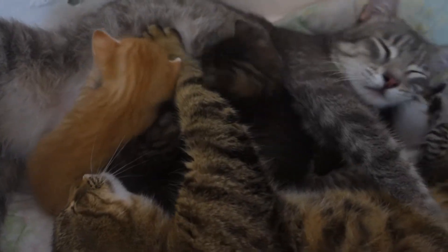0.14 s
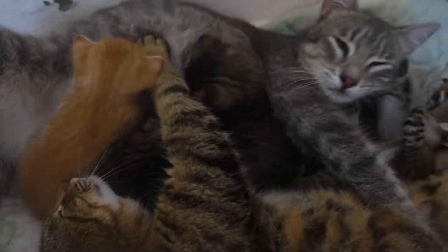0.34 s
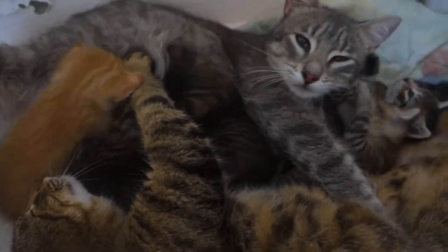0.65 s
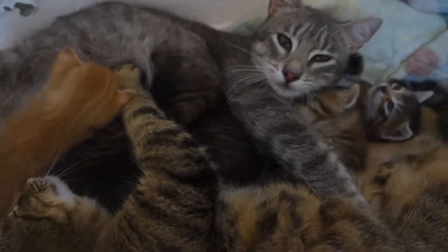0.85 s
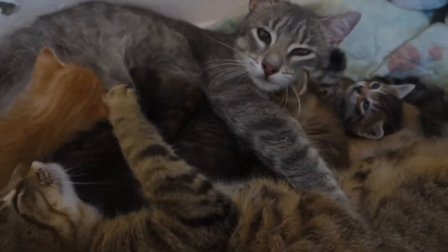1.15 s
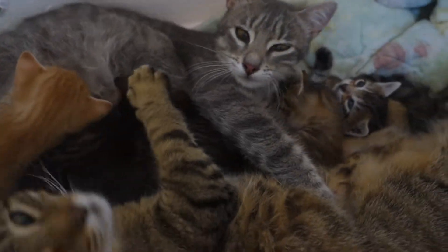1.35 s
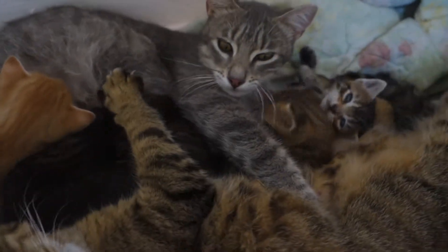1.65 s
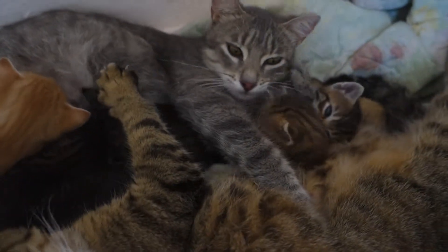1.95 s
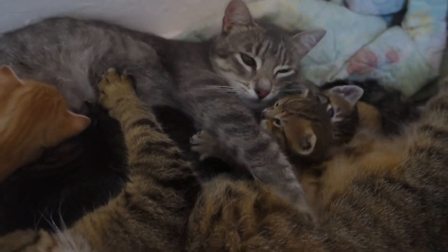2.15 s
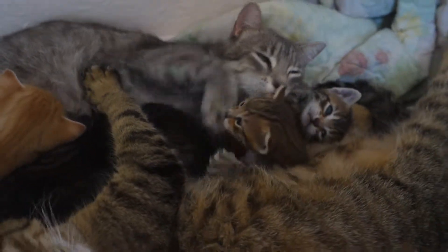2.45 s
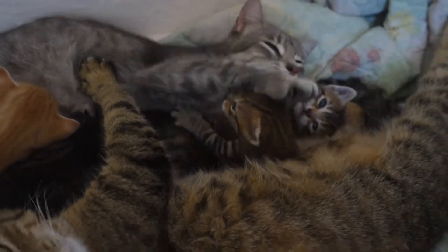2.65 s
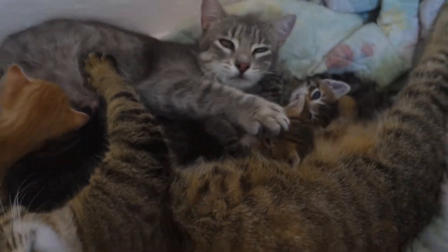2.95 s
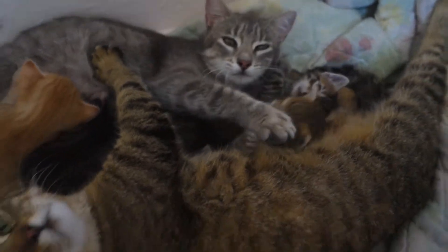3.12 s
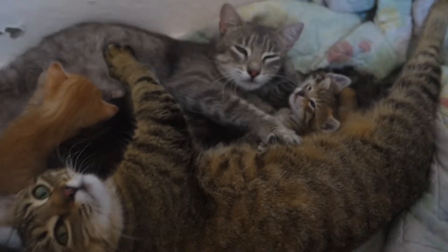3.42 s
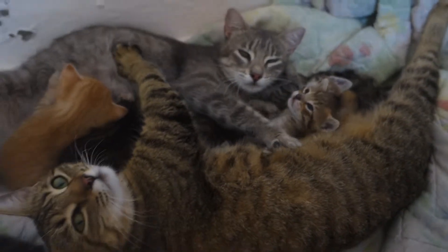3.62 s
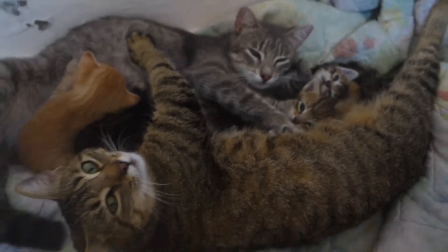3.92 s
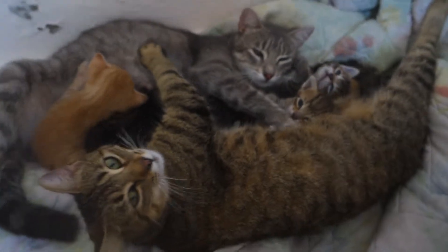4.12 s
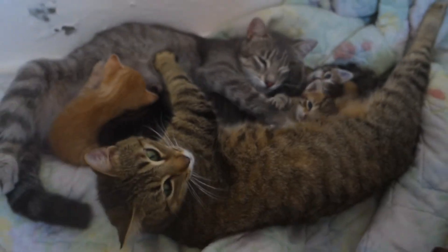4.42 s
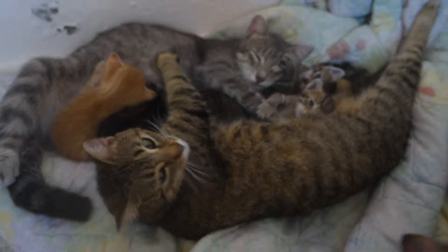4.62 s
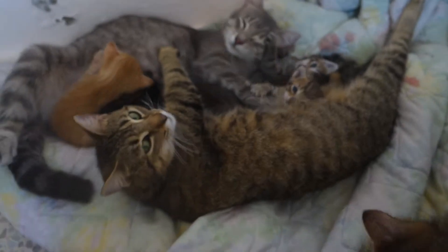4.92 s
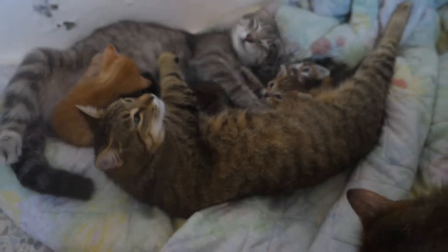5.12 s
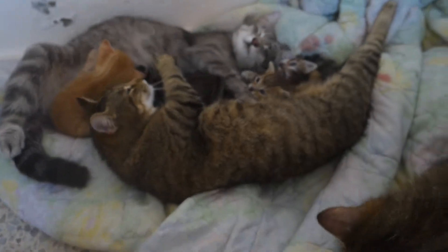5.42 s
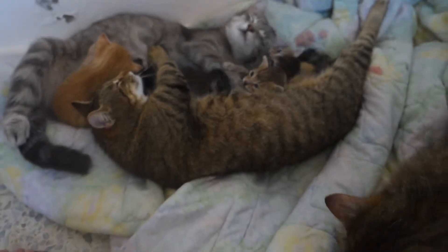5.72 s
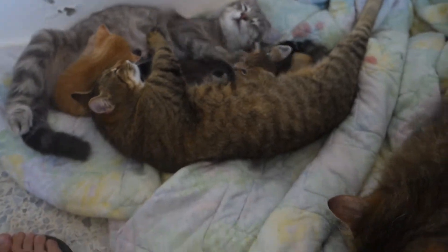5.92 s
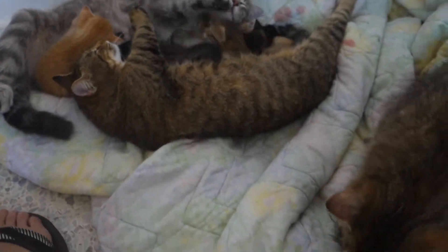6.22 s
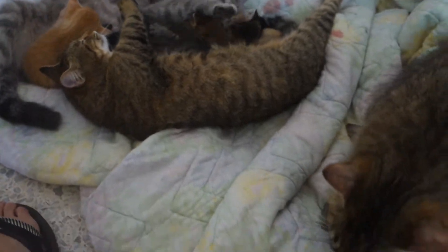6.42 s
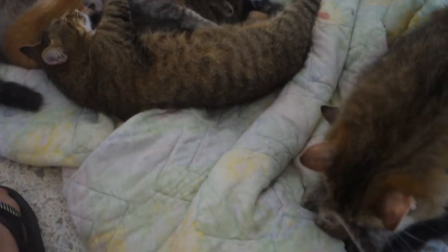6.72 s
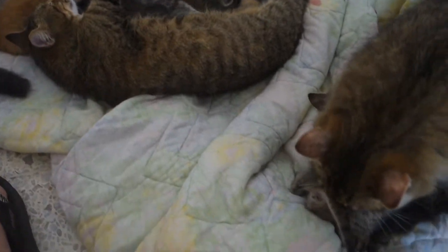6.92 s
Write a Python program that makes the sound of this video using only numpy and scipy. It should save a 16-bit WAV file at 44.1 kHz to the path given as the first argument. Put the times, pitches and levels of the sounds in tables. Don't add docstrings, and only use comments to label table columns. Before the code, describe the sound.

Shrill kitten mews and tiny squeaks ring through a bare room, with a cat's rolling trills, soft purrs, sharp claw snaps and low hum.

```python
import sys
import numpy as np
from scipy import signal
from scipy.fft import rfft, irfft
from scipy.io import wavfile
from scipy.ndimage import uniform_filter1d

SR = 44100
rng = np.random.default_rng(int(sys.argv[2]) if len(sys.argv) > 2 else 0)


def to_wav(s):
    ch = np.atleast_2d(s).T
    pcm = np.round(np.clip(ch, -1, 1) * 32767)
    wavfile.write(sys.argv[1], SR, pcm.astype(np.int16))


def gain_from_decibels(decibels):
    exponent = np.asarray(decibels, float) / 20
    return 10 ** exponent


N = 311326
LEAD = 8820


def rms_one(x):
    return x / np.sqrt(np.mean(x ** 2) + 1e-20)


def at_hz(points, hz):
    table_hz, value = np.transpose(points)
    return np.interp(np.log(hz), np.log(table_hz), value)


def drift(rate_hz, size=N):
    r = np.exp(-2 * np.pi * rate_hz * 40 / SR)
    noise = rng.standard_normal(size // 40 + 2002)
    slow = signal.lfilter([1], [1, -2 * r, r * r], noise)[2000:]
    return np.interp(np.arange(size) / 40, np.arange(len(slow)), rms_one(slow))


def panned(x, left_minus_right_db):
    return x * gain_from_decibels(np.array([[left_minus_right_db / 2], [-left_minus_right_db / 2]]))


def band_noise(low_hz, high_hz):
    band = signal.butter(3, [low_hz, high_hz], "band", fs=SR, output="sos")
    return rms_one(signal.sosfilt(band, rng.standard_normal(N)))


def bands(length):
    edges = 25 * 2 ** np.arange(0, 9.6, .5)
    white = rng.standard_normal((2, 2, length))
    for k, (low, high) in enumerate(zip(edges, edges[1:])):
        band = signal.butter(2, [low, high], "band", fs=SR, output="sos")
        yield np.sqrt(low * high), signal.sosfilt(band, white[k % 2])


def coherent_pair(mid, side, likeness):
    alike = np.clip(likeness, 0, 1)
    return np.sqrt(1 + alike) * mid + np.sqrt(1 - alike) * side * [[1], [-1]]


# frequency_hz, left_right_likeness (0-1)
LIKENESS = [(60, 1), (250, 0.98), (600, 0.9), (1500, 0.6), (4000, 0.043), (9000, 0.067), (15000, 0.17)]


def banded_noise(spectrum, patchy_db):
    out = 0
    for hz, (mid, side) in bands(N):
        gain = gain_from_decibels(at_hz(spectrum, hz) + patchy_db * drift(1.77))
        out = out + gain * coherent_pair(mid, side, at_hz(LIKENESS, hz))
    return rms_one(out)


def swelling(rest_db, swells):
    step = 32
    power = np.full(N // step + 2, gain_from_decibels(2 * rest_db))
    t = np.arange(len(power)) * step / SR
    for peak_s, rise_s, level_db in swells:
        age = np.maximum((t - peak_s) / rise_s + 1, 0)
        power += gain_from_decibels(2 * level_db) * (age * np.exp(1 - age)) ** 4
    return np.interp(np.arange(N) / step, np.arange(len(power)), np.sqrt(power))


# start_s, length_s, start_pitch_hz,
# end_pitch_hz, level_db
SQUEAKS = [
    (-.19, .17, 2650, 2350, -41),
    (1.307, 0.18, 3520, 3455, -41.5),
    (0.935, 0.12, 7055, 7050, -64),
    (0.978, 0.26, 6870, 6380, -58.5),
    (1.577, 0.093, 3450, 3446, -58),
    (3.745, 0.16, 3564, 3456, -43),
    (3.85, 0.56, 3526, 3407, -58),
]


def squeaks():
    out = np.zeros(N + LEAD)
    for start_s, length_s, start_hz, end_hz, level_db in SQUEAKS:
        n = round(length_s * SR)
        pitch_hz = np.linspace(start_hz, end_hz, n) * (1 + 0.0051 * drift(55, n))
        tone = np.sin(2 * np.pi * np.cumsum(pitch_hz) / SR)
        out[round(start_s * SR) + LEAD:][:n] += gain_from_decibels(level_db) * np.hanning(n) * tone
    return out


def mouth_db(hz, k, opening, sharpness):
    ratio = hz / (1500 + 3000 * opening)
    peak_db = -10 * np.log10((1 - ratio ** 2) ** 2 + (ratio / sharpness) ** 2)
    muffle_db_per_octave = 49.5 * np.maximum(0.43 - opening, 0)
    return peak_db - muffle_db_per_octave * np.log2(k)


SOURCE_DB = [0.05, -1, -4, -3]
# frequency_hz, level_over_partial_4_db
SHINE = [(5000, -8.5), (7200, -10.5), (8500, -26), (10000, -20.5), (12000, -16), (14000, -19.5),
         (16000, -28)]


def mew(rows, shine_db, hoarse):
    s, *columns = np.transpose(rows)
    span = np.arange(round(s[0] * SR), round(s[-1] * SR))
    n = len(span)
    pitch, effort_db, opening = [uniform_filter1d(np.interp(span / SR, s, c), size=900) for c in columns]

    soft_db, full_db, soft_q, loud_q = -62, -58.5, 4.7, 31.3
    sharpness = np.interp(effort_db, [soft_db, full_db], [soft_q, loud_q])
    sharpness = sharpness * np.interp(opening, [.5, .8], [0.54, 1])
    levels_db = []
    for k, source_db in enumerate(SOURCE_DB, start=1):
        q = sharpness if k < 4 else soft_q
        levels_db.append(effort_db + source_db + mouth_db(k * pitch, k, opening, q))
    levels_db[3] += np.interp(effort_db, [soft_db, full_db + 4], [-4, 0])

    tremble = 0.0044 * drift(20.8, n) + 0.0034 * hoarse * drift(98, n)
    phase = 2 * np.pi * np.cumsum(pitch * (1 + tremble)) / SR
    out = np.zeros(N + LEAD)
    for k in range(1, 17):
        level_db = levels_db[k - 1] if k < 5 else levels_db[3] + shine_db + at_hz(SHINE, k * pitch)
        breath = min(hoarse * max(k - 2, 0) ** 2 * .8, 2)
        wander_db = 1.2 * drift(47, n)
        voiced = (1 + breath * drift(68, n)) * np.sin(k * phase) + breath * drift(68, n) * np.cos(k * phase)
        gain = np.sqrt(2 / (1 + 2 * breath ** 2)) * gain_from_decibels(level_db + wander_db)
        out[span + LEAD] += gain * voiced * (k * pitch < 16500)
    return out


# start_s, pitch_hz, effort_db, mouth_opening (0-1)
MEWS = [
    [(-.06, 1163, -58.5, 1), (.005, 1310, -42, 0.68), (.035, 1452, -50, 0.78), (.128, 1435, -40, 0.5),
     (.15, 1427, -56.5, 0.56), (.25, 1391, -50, 0.26), (.36, 1064, -55.5, 0)],
    [(1.2, 1103, -67, 0.28), (1.28, 1352, -58.5, .7), (1.325, 1369, -49, 0.77), (1.36, 1476, -47.5, 0.73),
     (1.44, 1508, -46.5, .62), (1.52, 1468, -46.5, 0.54), (1.8, 1331, -55, 0.45), (1.93, 1090, -63, 0.16)],
    [(3.44, 619, -64, 0.02), (3.56, 1277, -63, 0.71), (3.6, 1331, -56.5, 0.67), (3.76, 1383, -43.5, 0.6),
     (3.92, 1409, -58.5, 0.38), (4.05, 1323, -62, 0.37), (4.12, 1144, -55, 0.03)],
    [(5.84, 728, -69, 0.26), (5.928, 1207, -53.5, 0.88), (5.96, 1300, -45, .81), (6.005, 1373, -45.5, 0.75),
     (6.05, 1452, -43, 0.78), (6.17, 1452, -45.5, 0.51), (6.235, 1415, -45.5, .36),
     (6.45, 1193, -55.5, 0.11)],
]
MEW_PAN_DB = [-2, -15, -10, -9]
MEW_SHINE_DB = [-4.5, 1, -6, 5.5]
MEW_HOARSE = [.03, 1.0, .35, .005]
MEW_ECHO_DB = [-1, 0.5, 2, -6]


def mews():
    calls = [mew(*call) for call in zip(MEWS, MEW_SHINE_DB, MEW_HOARSE)]
    direct = sum(panned(call, pan_db) for call, pan_db in zip(calls, MEW_PAN_DB))
    sent = sum(gain_from_decibels(level_db) * call for call, level_db in zip(calls, MEW_ECHO_DB))
    return direct, sent


# frequency_hz, t60_s
ROOM_T60 = [(300, 0.71), (1400, 1.58), (2400, 2), (2800, 1.45), (3500, 1.5), (4200, 1.33), (7000, 1.5),
            (13000, 0.66)]
# frequency_hz, left_right_likeness (0-1)
ROOM_LIKENESS = [(300, 1), (700, 1), (1500, 0.85), (3000, 0.22), (6000, 0.12)]


def room(x):
    t = np.arange(round(1.6 * SR)) / SR
    echo = 0
    for hz, (mid, side) in bands(len(t)):
        pair = coherent_pair(mid, side, at_hz(ROOM_LIKENESS, hz))
        echo = echo + pair * gain_from_decibels(-60 * t / at_hz(ROOM_T60, hz))
    onset = np.clip((t - .003) / 0.0043, 0, 1)
    near_walls = 1 + 1.7 * np.exp(-t / 0.17)
    echo = rms_one(echo * onset * near_walls) / np.sqrt(len(t))
    return signal.fftconvolve(x[None], echo, axes=1)[:, :len(x)]


def afterglow():
    t = np.arange(N) / SR
    fade = gain_from_decibels(-49 - 8.5 * t - 40 * np.maximum(t - 1.15, 0))
    return fade * np.array([band_noise(2140, 3320) + 0.88 * band_noise(2300, 2700) for _ in "lr"])


# frequency_hz, width_hz, level_db
DRONES = [
    (84.1, 3, -49.5),
    (105.5, 17, -56),
    (356, 18, -57),
    (425, 11, -61),
]


def hum():
    level_db = -35.5 + 0.28 * drift(0.84)
    out = np.sqrt(2) * gain_from_decibels(level_db) * np.sin(2 * np.pi * 59.83 * np.arange(N) / SR + 0.43)
    for hz, width_hz, level_db in DRONES:
        r = np.exp(-np.pi * width_hz / SR)
        poles = [1, -2 * r * np.cos(2 * np.pi * hz / SR), r * r]
        out += gain_from_decibels(level_db) * rms_one(signal.lfilter([1, 0, -1], poles, rng.standard_normal(N)))
    return out


# frequency_hz, density_db (dB per Hz)
AIR = [(28, -9), (45, -7), (80, 3.5), (120, -6.5), (160, -12.5), (220, -12), (400, -9.5), (630, -16),
       (1000, -14.5), (1600, -24), (2500, -34.5), (4500, -47), (8000, -49.5), (16000, -39)]


def ventilation():
    return gain_from_decibels(-45) * banded_noise(AIR, patchy_db=.9)


# peak_s, rise_s, level_db
DEEP_SWELLS = [(.23, 0.035, -46.5), (.5, 0.24, -51), (1.14, 0.038, -49), (1.62, 0.22, -46.5),
               (2.08, 0.063, -51), (2.45, 0.23, -50), (2.71, 0.037, -46), (2.95, 0.098, -47.5),
               (3.52, 0.26, -50.5), (5.499, 0.05, -47), (6.7, 0.04, -49)]
# peak_s, rise_s, level_db
CHESTY_SWELLS = [(.23, 0.063, -49), (0.571, 0.053, -41.5), (1.14, 0.018, -61.5), (3.05, 0.029, -43),
                 (5.41, 0.12, -47.5), (6.188, 0.24, -48), (6.622, 0.11, -44.5), (6.98, 0.056, -44)]


def purr():
    deep = swelling(-54.5, DEEP_SWELLS) * gain_from_decibels(0.33 * drift(27)) * band_noise(131.0, 173.6)
    chesty = swelling(-55, CHESTY_SWELLS) * gain_from_decibels(0.45 * drift(17)) * band_noise(196, 304)
    return deep + chesty


# frequency_hz, density_db (dB per Hz)
RUSTLE_COLOUR = [(2500, 6.5), (5000, 0), (9000, -1.5), (13000, -10), (16000, -1.5)]
# peak_s, rise_s, level_db
STIRS = [(0.019, 0.27, -59.5), (.75, .3, -64), (1.22, .07, -55.5), (1.42, 0.21, -66), (1.918, 0.11, -59),
         (2.7, 0.081, -62), (3.8, 0.17, -65.5), (4.56, 0.027, -65), (4.773, 0.009, -52.5),
         (5.901, 0.13, -61), (6.25, 0.11, -62.5)]


def rustle():
    hiss = banded_noise([(1200, -60.5), *RUSTLE_COLOUR], patchy_db=1.0)
    return swelling(-65.5, STIRS) * panned(hiss, -5.5)


# start_s, pitch_hz, effort_db
TRILLS = [
    [(.503, 375, -37), (.535, 392.3, -43), (.564, 439.4, -27.5), (.68, 384.8, -30.5), (.75, 407.3, -28.5),
     (.82, 435.8, -27.5), (.9, 484.7, -29.5), (.97, 493.5, -32), (1.05, 504.5, -48)],
    [(2.874, 350, -30.5), (2.93, 379.7, -36.5), (2.97, 405.7, -31), (3.03, 380.5, -51)],
    [(5.382, 405, -41), (5.42, 425, -28), (5.45, 415, -25.5), (5.52, 425, -36)],
]


def throbs():
    period_s, slip_s, scatter_db = .0305, .002, 1.5
    rows = []
    for s, _, effort_db in map(np.transpose, TRILLS):
        age = np.arange(0, s[-1] - s[0], period_s)
        slip, loud, bright = rng.standard_normal((24, 3))[:len(age)].T
        level_db = np.interp(s[0] + age, s, effort_db) + scatter_db * loud
        over_db = np.interp(age, [0, .25], [-20, -4])
        rows.append([s[0] + age + slip_s * slip, level_db, over_db + 2 * scatter_db * bright])
    return np.hstack(rows)


def pulse_train(start_s, level_db, rise_s):
    impulses = np.zeros(N)
    impulses[(start_s * SR).astype(int)] = gain_from_decibels(level_db)
    t = np.arange(round(.08 * SR)) / SR
    return signal.fftconvolve(impulses, (t / rise_s * np.exp(1 - t / rise_s)) ** 2)[:N]


def trill():
    start_s, level_db, over_db = throbs()
    throb = pulse_train(start_s, level_db, .0115)
    edge = pulse_train(start_s, level_db + over_db, .007)
    pitch = np.interp(np.arange(N) / SR, *np.vstack(TRILLS).T[:2]) * (1 + .022 * drift(60))
    phase = 2 * np.pi * np.cumsum(pitch) / SR
    overtones = 0.49 * np.sin(2 * phase) + 0.5 * np.sin(3 * phase)
    breathy = .33 * throb * band_noise(260, 520) + .22 * edge * band_noise(850, 1550)
    return throb * np.sin(phase) + edge * overtones + breathy


# start_s, peak_level_db, length_s, brightness_db_per_octave, left_minus_right_db
SNAGS = [
    (1.776, -44, .004, -18, -9),
    (4.7027, -15.5, 0.0011, -2, -7),
    (4.704, -21, 0.0013, -4, -20),
    (4.7752, -25, 0.0018, -11, -18),
    (4.946, -44, 0.0026, -3, -3),
    (5.002, -49, 0.0053, -7.5, -5.5),
    (5.758, -48.5, 0.0091, -8, -9),
]


def snags():
    out, n = np.zeros((2, N)), 1024
    t, hz = np.arange(n) / SR, np.arange(1, n // 2 + 2) * SR / n
    fizz = 1 + 3.8 * np.exp(-((hz - 15000) / 1600) ** 2)
    low_cut = 1 + (2000 / hz) ** 6
    for start_s, level_db, length_s, tilt_db, pan_db in SNAGS:
        noise = rng.standard_normal((2, n))
        colour = gain_from_decibels(tilt_db * np.log2(hz / 5000)) * fizz / low_cut
        crackle = rms_one(irfft(rfft(noise[0] + .5 * noise) * colour))
        shape = np.exp(-(t / length_s) ** 4) + 0.05 * np.exp(-t / 0.0017)
        start = round(start_s * SR)
        out[:, start:start + n] += panned(gain_from_decibels(level_db - 9.5) * shape * crackle, pan_db)
    return out


def scene():
    small = squeaks()
    direct, mews_sent = mews()
    mother = trill()
    sent = mews_sent + small + gain_from_decibels(-5) * np.pad(mother, (LEAD, 0))
    echo = panned(room(sent), -3.2)
    voices = (gain_from_decibels(-0.5) * (direct + 0.18 * small) + echo)[:, LEAD:]
    room_floor = afterglow() + hum() + ventilation()
    return voices + room_floor + purr() + rustle() + mother + snags()


def band_limit(x):
    return signal.sosfilt(signal.butter(12, 15800, fs=SR, output="sos"), x)


def record(dry):
    return band_limit(dry)


dry = scene()
out = record(dry)
to_wav(out)
```